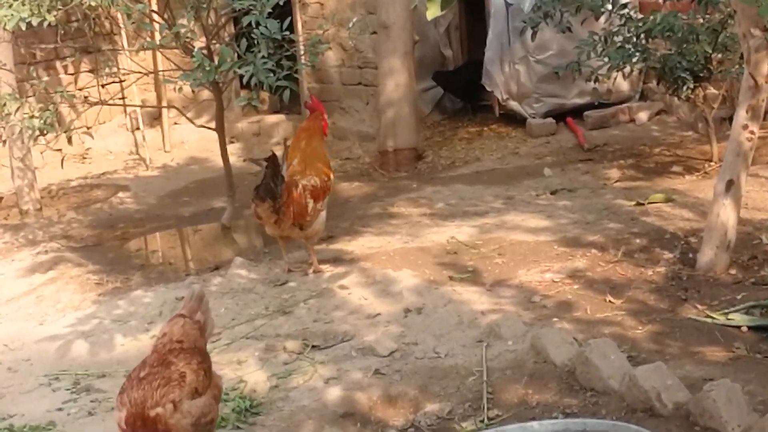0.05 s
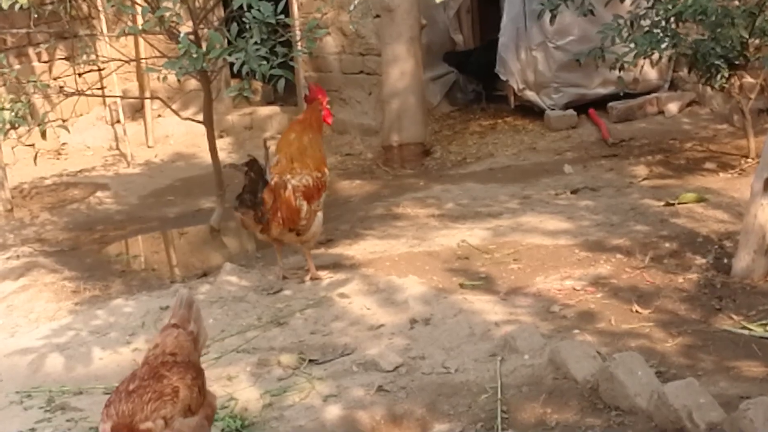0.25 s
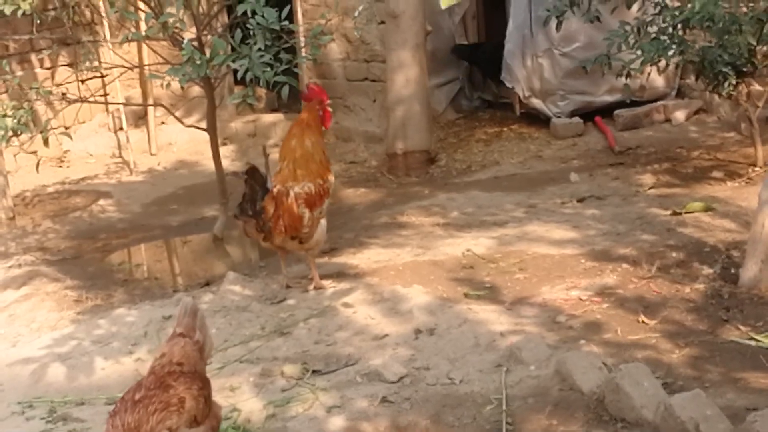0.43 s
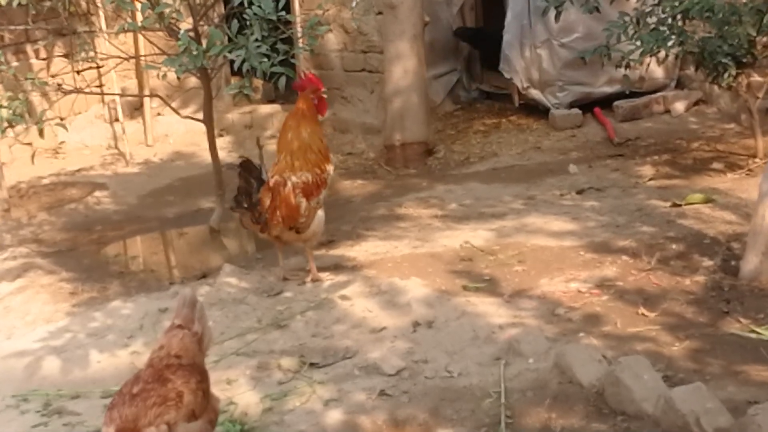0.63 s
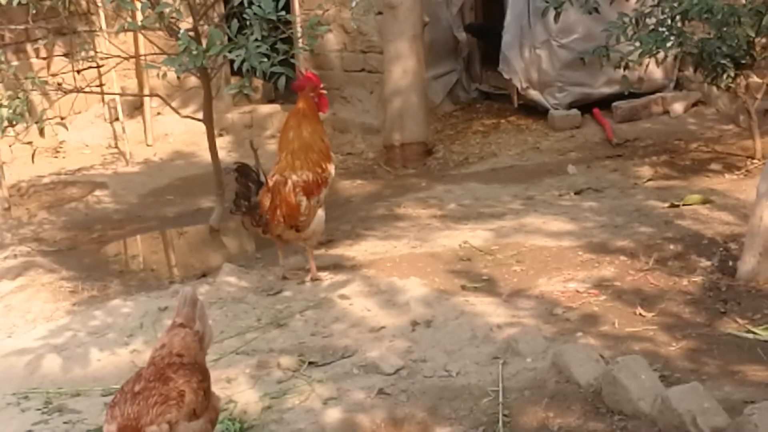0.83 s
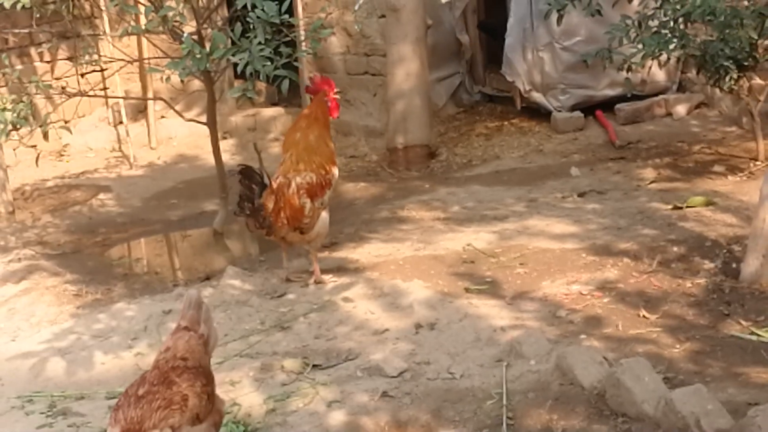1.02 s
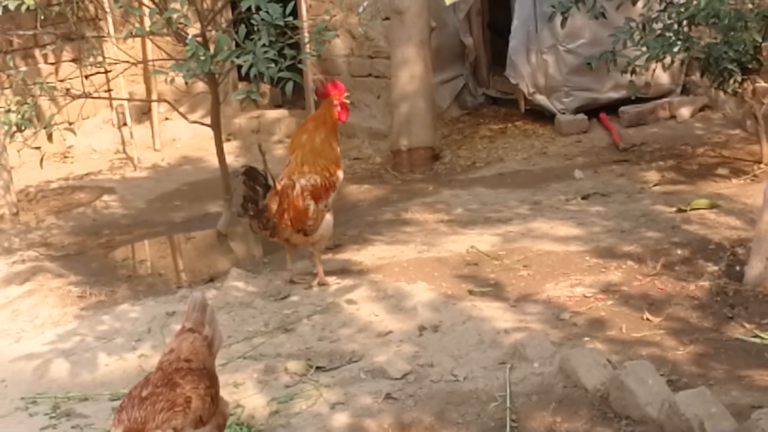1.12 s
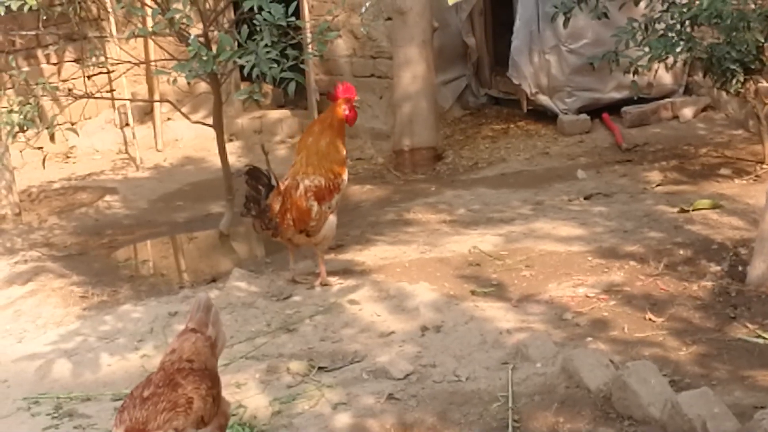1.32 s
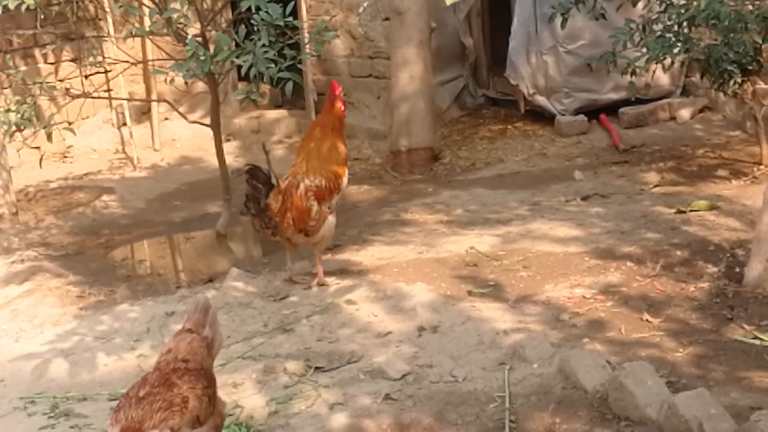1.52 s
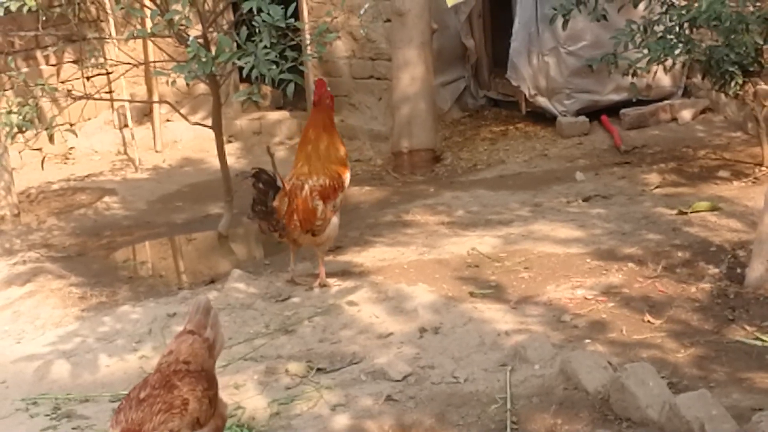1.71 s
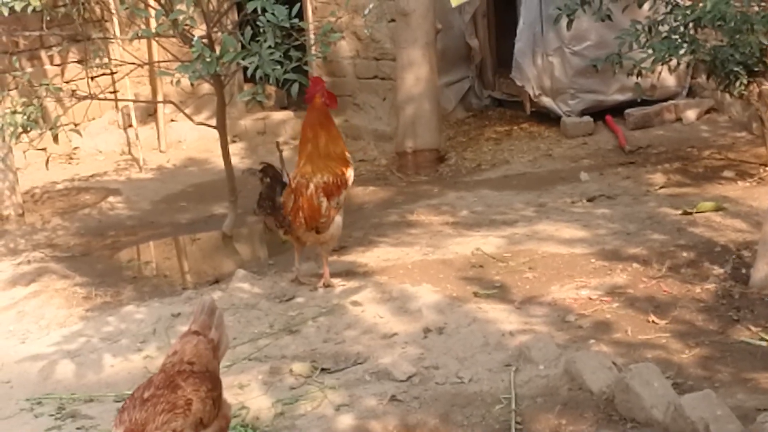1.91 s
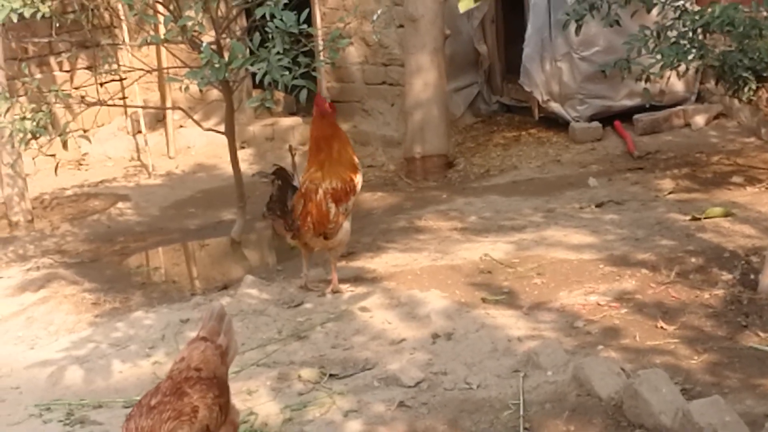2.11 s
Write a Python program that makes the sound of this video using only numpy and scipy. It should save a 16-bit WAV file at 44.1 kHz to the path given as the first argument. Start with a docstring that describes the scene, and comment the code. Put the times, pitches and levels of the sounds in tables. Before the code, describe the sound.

A rooster gives a short warbling note, then a swooping rise into a long held crow that turns raspy and drops at the end; small bird chirps on the left, quiet walled yard, stereo microphone a few metres away.

```python
"""Rooster crowing in a walled yard

A rooster a few metres off gives a warbling first note, a swooping second, then a long held call that
breaks twice into hoarseness and cracks at the end; its voice is a stack of sines plus pulsed noise.
A small bird buzzes high on the left: two trilled sines and a noisy rasp. Shaped noise makes the
distant rumble, air hiss, faint drone and dull double tick; fading noise gives the walls' answer."""
import sys
import numpy as np
from scipy import signal
from scipy.fft import rfft, irfft, next_fast_len
from scipy.io import wavfile
from scipy.ndimage import map_coordinates

SR = 44100
rng = np.random.default_rng(int(sys.argv[2]) if len(sys.argv) > 2 else 0)


def waveform_to_disk(signal):
    """Save audio, clipped to [-1, 1], as 16-bit WAV at the path in sys.argv[1]."""
    frames = np.transpose(np.atleast_2d(signal))
    scaled = np.clip(frames, -1, 1) * 32767
    samples = np.round(scaled).astype(np.int16)
    wavfile.write(sys.argv[1], SR, samples)


def gain_from_db(level_db):
    """Turn a decibel level (scalar or array-like) into a linear amplitude factor."""
    decades = np.asarray(level_db, float) / 20
    return 10 ** decades


N = 94815  # length in samples

# Background air, its tone colour. Each row: frequency in Hz, relative level in dB.
AIR_COLOUR = [(12, -88), (20, -8.5), (137, -10), (491, -19), (597, -18), (667, -17), (932, -22.5),
              (1100, -24), (1920, -23.5), (3000, -27.5), (3450, -36), (3960, -34), (5690, -31),
              (15500, -38)]
# Loudness of the air before its small wander. Each row: time in seconds, level in dB.
AIR_LEVEL = [(0.0, -59.5), (0.25, -61), (1.02, -63.5), (1.4, -58.5), (1.62, -62), (2.15, -58)]
# How alike the air is in the two ears. Each row: frequency in Hz, likeness (1 same, 0 unrelated).
AIR_LIKENESS = [(30, 1), (100, .995), (200, .9), (400, .3), (1000, .1), (10000, 0)]

# Small bird's calls. Each row: start in seconds, level in dB before the trill swells it,
# top pitch of the high voice in Hz, top pitch of the low voice in Hz, length in seconds.
BIRD_CALLS = [(0.149, -43, 10350, 5070, 0.066), (.243, -42, 10100, 4810, 0.062),
              (0.689, -45, 10370, 4757, 0.057), (1.282, -35.5, 9917, 4760, 0.046),
              (1.363, -29.5, 9690, 4082, 0.041), (1.436, -31.5, 9600, 3960, 0.053)]
# Tone colour of the bird's broad rasp. Each row: frequency in Hz, relative level in dB.
RASP_COLOUR = [(2000, -60), (3000, -11.5), (4500, -2.5), (7000, -4.5), (9000, 4), (10000, -17),
               (10600, -99)]

# How slowly the walls' answer dies. Each row: frequency in Hz, time to fall by 60 dB in seconds.
WALL_FADE = [(300, 0.98), (900, 0.54), (2200, 0.49), (4000, 0.4), (9000, 0.36), (14000, 0.19)]

# The rooster's notes, in three tables alike. Each row: time in seconds, pitch in Hz, levels of
# overtones 1 to 4 in dB (1 is the pitch itself), level of all higher overtones together in dB,
# and extra left over right in dB for the parts between overtones 1 and 4.
FIRST_NOTE = [(0.225, 569, -83, -47, -41, -46, -50, 4), (0.241, 605.1, -55, -40, -25.5, -32.5, -48.5, -4.0),
              (0.277, 664, -53.5, -28, -31, -46, -37.5, -3), (0.293, 672, -35.5, -33, -42, -65, -42, -2),
              (0.299, 730.5, -38.5, -28.5, -32, -52, -34, -1),
              (0.323, 727.5, -33.5, -27, -34.5, -46, -43, -4), (0.345, 660, -35, -38, -27.5, -47, -36, -2),
              (0.357, 667.5, -35, -34, -37, -49, -37.5, -6.0),
              (0.387, 642, -41, -31.5, -28.5, -48, -36.5, -2),
              (0.411, 613.8, -53, -35.5, -33.5, -47, -40, -4),
              (0.435, 573.6, -59, -41, -33, -37, -40, 10.5), (0.445, 598, -39, -92, -53, -57, -77, -5)]
LONG_CALL = [(0.535, 500.2, -86, -43, -37, -31, -60, -5), (0.565, 772, -29, -23, -33, -48, -39, 0),
             (0.583, 887.7, -31, -27, -39.5, -40.5, -42, -2.5), (0.603, 917, -23, -19, -33.5, -31, -48, 3),
             (0.639, 885.5, -27, -27, -46, -31.5, -43, 0), (0.655, 825.5, -32.5, -27, -29, -63, -56, 7),
             (0.659, 788.4, -29, -95, -49, -82, -45, -11), (0.661, 755, -28, -41, -39, -73, -42, -7),
             (0.681, 601, -77, -34, -33, -50, -43, 1), (0.707, 651, -45, -29, -43, -33, -49.5, -6),
             (0.723, 781.7, -34, -26.5, -63, -76, -43, 4), (0.735, 819, -38.5, -27, -34.5, -49, -47, -3),
             (0.771, 897.6, -33.5, -26.5, -37.5, -59, -52, -1.5),
             (0.805, 875, -42.5, -27, -41, -54, -45.5, 2), (0.831, 888, -26.5, -28, -46, -28, -42, -9.5),
             (0.863, 903.4, -37.5, -27.5, -36.5, -38.5, -48, 2.5),
             (0.927, 887.3, -26.5, -24.5, -48, -33, -43, -2.5),
             (0.937, 889, -28.5, -28.5, -40.5, -35.5, -45.5, -6),
             (0.981, 870.5, -34, -21.5, -45, -65, -44, 8), (1.001, 870, -34.5, -24, -35, -28, -41.5, 5.5),
             (1.063, 861.5, -34, -31.5, -43, -74, -47, -0.5), (1.111, 903, -28, -33, -61, -88, -40.5, -13),
             (1.159, 903.9, -27.5, -24, -41, -61, -44.5, 1),
             (1.333, 892.3, -34.5, -29, -43, -57, -42.5, 5.5),
             (1.381, 885.4, -37, -25.5, -54, -47, -43, 5.5), (1.433, 884.4, -38, -28, -40, -55, -49.5, 7),
             (1.449, 876, -34, -22.5, -59, -35, -58, -7), (1.463, 892, -35, -28.5, -66, -81, -38, 17)]
CALL_END = [(1.469, 839.5, -38.5, -20, -39.5, -54, -51, 0.5),
            (1.483, 836.7, -37.5, -23.5, -60, -19.5, -43.5, 1.5),
            (1.523, 837.9, -43.5, -26, -56, -30, -38.5, 13.5), (1.569, 833, -36, -21.5, -61, -32, -45, 0),
            (1.601, 838.3, -33.5, -26.5, -45.5, -33, -41.5, 8.5),
            (1.625, 833.3, -31, -27.5, -34, -41, -54, 5.5), (1.657, 847, -29.5, -25, -34, -29, -45, 1),
            (1.735, 831, -37, -34, -33.5, -37, -52, -1), (1.749, 828.7, -31.5, -29, -38, -26.5, -49, 4),
            (1.761, 813, -29.5, -30, -32.5, -49, -54, 1), (1.771, 680, -35.5, -29.5, -43, -41, -46, -2),
            (1.825, 608.7, -47.5, -39.5, -29.5, -49, -57, -4),
            (1.837, 575.4, -44.5, -38, -31, -29, -49, -1), (1.865, 563, -49, -74, -56, -60, -52, 9)]  # after the pitch drops a step
# How rough the voice is. Each row: time in seconds, hoarseness from 0 to 1, share of half pitches
# from 0 to 1, share of hiss among the higher overtones from 0 to 1.
ROUGHNESS = [(.22, .025, 0, .65), (.45, .035, 0, .65), (.54, .2, .15, .75), (.6, .035, .04, .3),
             (.65, .06, .05, .6), (.71, .07, .05, .7), (.73, .45, .7, .75), (.79, .45, .7, .7),
             (.82, .04, .04, .12), (.94, .03, .02, .1), (.96, .006, 0, .05), (1.0, .015, 0, .1),
             (1.015, .45, .7, .7), (1.075, .4, .7, .5), (1.1, .035, .12, .25), (1.17, .006, .07, .07),
             (1.28, .006, .04, .06), (1.36, .004, 0, .02), (1.62, .004, 0, .01), (1.65, .04, .03, .15),
             (1.7, .045, .15, .15), (1.75, .06, .1, .25), (1.78, .16, .45, .55), (1.87, .22, .45, .7)]
# Pitch warbles. Each row: start in seconds, end in seconds, rate in Hz, depth as a share of pitch.
PITCH_WARBLES = [(0.286, 0.408, 42.37, 0.043), (0.817, 0.946, 44.98, .012), (1.63, 1.676, 144.7, 0.022)]
# Tone colour the throat gives. Each row: frequency in Hz, relative level in dB.
THROAT_COLOUR = [(100, -100), (350, -80), (600, -15.5), (900, -6), (1300, -8.5), (1800, -1.5), (2400, -1.5),
                 (2900, -20.5), (3400, -2.5), (4000, -32), (4600, -35), (5000, -39.5), (5400, -25.5),
                 (5900, -16.5), (6700, -21.5), (7500, -29), (8500, -28), (10000, -37.5), (11500, -43.5),
                 (13500, -46), (15500, -59)]
# Extra loudness of the rooster on the left. Each row: frequency in Hz, left over right in dB.
EAR_LEAN = [(700, -1.5), (1700, 3.06), (2400, -18), (3400, 2.2), (6000, 2), (12000, 11)]
# Extra lag of the rooster's waves in the left ear. Each row: frequency in Hz, lag in radians.
EAR_PHASE_LAG = [(700, 0.22), (1700, 0.2), (2400, 0.54), (3400, 1), (6000, 0.79), (12000, 0.36)]

# Loudness of the faint low drone. Each row: time in seconds, level in dB.
DRONE_LEVEL = [(.7, -109), (.85, -67.5), (1.1, -65.5), (1.35, -62), (1.5, -101)]
# Tone colour of the drone. Each row: frequency in Hz, relative level in dB.
DRONE_COLOUR = [(200, -56), (290, -22), (340, -15), (420, -10), (560, -56)]

# The faint dull double tick. Each row: start in seconds, level in dB.
TICK_STARTS = [(2.073, -44), (2.079, -45)]
# Tone colour of the tick. Each row: frequency in Hz, relative level in dB.
TICK_COLOUR = [(60, -69), (200, -33), (500, 25), (2500, 15), (4000, -11), (10000, 8), (14000, -86)]

TRILL_HZ, SWEEP_SHARE, BLUR_SHARE = 32.1, 0.091, 0.035  # bird: beats a second; shares of its pitch
LOW_VOICE_DB, RASP_DB, BIRD_LEFT_DB = -19, -19, 9  # first two against the high voice; left over right
LOW_LEAD_S = 0.007  # the bird's low voice and rasp start this much early
WALL_ROOSTER_DB, WALL_BIRD_DB, WALL_DELAY_S = -9.5, -1.5, 0.012
JITTER_SHARE, JITTER_HZ, SHIMMER_SHARE = 0.13, 300, 1.1  # pitch and loudness shake at full hoarseness
BREATH_DB = 1  # against overtones 1 to 4, at full hoarseness
DRIFT_DB, SPREAD_DB = 5, 0.5  # wander of each higher overtone; wander between the ears
NOTE_EDGE_S, EAR_LAG_S = 0.0044, 0.00011  # soft note ends; the left ear hears the rooster later
TOP_HZ, HISS_FROM_HZ = 15600, 5200  # highest overtone; lowest voice hiss
HIGH_HALF_GAIN = 14  # half pitches stand out more among the higher overtones
TICK_FADE_S = 0.016  # time to fall by 60 dB


def unit(x):
    """Scales a sound to an average strength (rms) of 1."""
    return x / np.sqrt(np.mean(x ** 2) + 1e-20)


def along(points, hz):
    """Reads a value between (Hz, value) points, spacing frequency as the ear does."""
    f, v = np.transpose(points)
    return np.interp(np.log(hz + 1), np.log(f + 1), v)


def curves(rows):
    """Gives one value per sample for each column after the time."""
    s, *cols = np.transpose(rows)
    return [np.interp(np.arange(N) / SR, s, c) for c in cols]


def wobble(rate):
    """A smooth random curve with rate random points a second."""
    points = rng.standard_normal(int(N * rate / SR) + 4)
    return map_coordinates(points, [np.arange(N) * rate / SR])


def filtered(x, response):
    """Shapes a sound by multiplying its spectrum by a response of frequency."""
    m = next_fast_len(N + 8192)
    return irfft(rfft(x, m) * response(np.fft.rfftfreq(m, 1 / SR)), m)[..., :N]


def coloured(x, points):
    """Gives a sound the tone colour in a table of (Hz, dB)."""
    return filtered(x, lambda f: gain_from_db(along(points, f)))


def gate(start, end, edge_s):
    """1 between two times, with soft edges, and 0 elsewhere."""
    t = np.arange(N) / SR
    return np.clip(np.minimum(t - start, end - t) / edge_s, 0, 1)


def air():
    """Noise whose low rumble is alike in both ears and whose hiss is unrelated; its level wanders."""
    def response(f):
        # The split between middle and sides sets how alike the ears are.
        turn = np.arccos(np.clip(along(AIR_LIKENESS, f), -1, 1)) / 2
        return gain_from_db(along(AIR_COLOUR, f)) * [np.cos(turn), np.sin(turn)]

    mid, side = filtered(rng.standard_normal((2, N)), response)
    level_db = curves(AIR_LEVEL)[0] + 0.5 * wobble(8.415)
    return gain_from_db(level_db) * unit(np.array([mid + side, mid - side]))


def bird():
    """Two unrelated voices and a rasp; each beat of a fast trill sweeps up towards the top pitch."""
    out, t = np.zeros(N), np.arange(N) / SR
    rasp = unit(coloured(rng.standard_normal(N), RASP_COLOUR))
    for start, db, high_hz, low_hz, length in BIRD_CALLS:
        end = start + length
        beat = ((t - start) * TRILL_HZ) % 1  # runs from 0 to 1 in each beat
        bend = 1 - SWEEP_SHARE * (1 - beat) ** 7 - BLUR_SHARE * np.abs(wobble(500))
        high, low = (np.sin(2 * np.pi * np.cumsum(hz * bend) / SR) for hz in (high_hz, low_hz))
        early = gate(start - LOW_LEAD_S, end, 0.002) * (gain_from_db(LOW_VOICE_DB) * low + gain_from_db(RASP_DB) * rasp)
        voices = gate(start, end, 0.013) * high + early
        swell = (0.89 + np.sin(np.pi * beat)) * gain_from_db(2.1 * wobble(120))
        out += gain_from_db(db) * swell * voices
    return out * gain_from_db(np.array([[0.5], [-0.5]]) * BIRD_LEFT_DB)


def walls(x):
    """The yard's answer: a delayed tail of noise in which each frequency dies at its own speed."""
    hz, t, z = signal.stft(rng.standard_normal((2, SR)), SR, nperseg=256)
    fade = gain_from_db(-60 * t / along(WALL_FADE, hz)[:, None])
    tail = signal.istft(z * fade, SR, nperseg=256)[1]
    tail = np.pad(tail / np.linalg.norm(tail[0]), ((0, 0), (round(WALL_DELAY_S * SR), 0)))
    return signal.fftconvolve(x, tail, axes=1)[:, :N]


def rooster():
    """Overtones of a jittering syrinx through the throat; hoarseness adds half pitches and pulsed breath."""
    call = list(LONG_CALL) + list(CALL_END)
    pitch_hz, *low_db, high_db, pan_db = curves(list(FIRST_NOTE) + call)
    hoarse, half, airy = np.clip(curves(ROUGHNESS), 0, 1)
    t, ears = np.arange(N) / SR, np.array([[0.5], [-0.5]])  # left, right

    warble = 0
    for start, end, rate, depth in PITCH_WARBLES:
        turns = np.sin(2 * np.pi * rate * t + 0.41 * wobble(20.87))
        warble = warble + depth * gate(start, end, 0.011) * turns
    hz = pitch_hz * (1 + warble + JITTER_SHARE * hoarse * wobble(JITTER_HZ))
    phase = 2 * np.pi * (np.cumsum(hz) / SR - ears * EAR_LAG_S * pitch_hz)
    effort = np.sqrt(np.sum(gain_from_db(2 * np.array(low_db)), axis=0))  # strength of overtones 1 to 4

    def partial(k, size):
        """A sine at k times the pitch, leaning to one ear."""
        lean_db = along(EAR_LEAN, k * pitch_hz) + pan_db * (1 < k < 4) + SPREAD_DB * wobble(7.7)
        lag = ears * along(EAR_PHASE_LAG, k * pitch_hz)
        wave = np.sin(k * phase - lag + rng.uniform(0, 2 * np.pi))
        return np.sqrt(2) * size * gain_from_db(lean_db * ears) * wave

    def throat(k):
        """How strongly the throat passes k times the pitch."""
        return gain_from_db(along(THROAT_COLOUR, k * pitch_hz)) * (k * pitch_hz < TOP_HZ)

    low = sum(partial(k + 1, gain_from_db(db)) for k, db in enumerate(low_db))
    halves = sum(partial(k + 0.5, half * effort * throat(k + 0.5)) for k in (1, 2, 3, 4))

    # Higher overtones and half pitches, from 5 to 22.5 times the pitch.
    orders = np.arange(10, 46) / 2
    high, power = 0, 0
    for k in orders:
        size = throat(k) * (np.minimum(HIGH_HALF_GAIN * half, 1) if k % 1 else 1)
        high = high + partial(k, size * gain_from_db(DRIFT_DB * wobble(10.65)))
        # The part above the hiss limit counts most when the level is set.
        power = power + size ** 2 * np.clip(k * pitch_hz / HISS_FROM_HZ, 0, 1) ** 8
    high = high / np.sqrt(power)

    # Noise that pulses once in each cycle of the pitch.
    pulsed = rng.standard_normal((2, N)) * (0.43 + np.cos(phase))
    hiss = unit(filtered(pulsed, lambda f: gain_from_db(along(THROAT_COLOUR, f)) * (f > HISS_FROM_HZ)))
    high = gain_from_db(high_db) * (np.sqrt(1 - airy) * high + np.sqrt(airy) * hiss)
    breath = unit(coloured(rng.standard_normal((2, N)) * (1 + np.cos(phase)), THROAT_COLOUR))

    shimmer = 1 + SHIMMER_SHARE * hoarse * wobble(250)
    voice = (low + halves + high) * shimmer + gain_from_db(BREATH_DB) * hoarse * effort * breath
    return voice * sum(gate(note[0][0], note[-1][0], NOTE_EDGE_S) for note in (FIRST_NOTE, call))


def drone():
    """A narrow band of low noise that swells and fades."""
    colour = [(20, -120)] + list(DRONE_COLOUR) + [(2000, -120)]
    return gain_from_db(curves(DRONE_LEVEL)[0]) * unit(coloured(rng.standard_normal((2, N)), colour))


def tick():
    """Short coloured puffs of noise that start at once and die quickly."""
    t = np.arange(N) / SR
    shape = sum((t > s) * gain_from_db(db - 60 * np.abs(t - s) / TICK_FADE_S) for s, db in TICK_STARTS)
    return shape * unit(coloured(rng.standard_normal((2, N)), TICK_COLOUR))


def scene():
    """Rooster and bird with the walls' answer, over the air, drone and tick."""
    cock, small = rooster(), bird()
    answer = walls(gain_from_db(WALL_ROOSTER_DB) * cock + gain_from_db(WALL_BIRD_DB) * small)
    return air() + small + cock + answer + drone() + tick()


def band_limit(x):
    """A steep low-pass at the top of the band."""
    return signal.sosfilt(signal.butter(12, 15670, fs=SR, output="sos"), x)


def record(dry):
    """Turns the finished mix into the sound that is written out."""
    return band_limit(dry)


dry = scene()
out = record(dry)
waveform_to_disk(out)
```